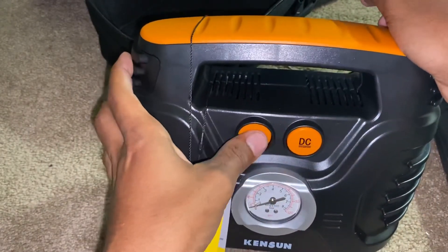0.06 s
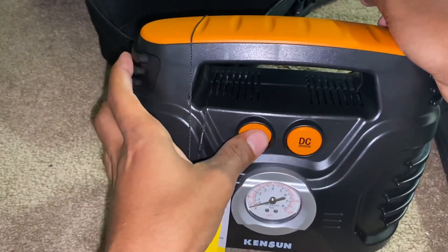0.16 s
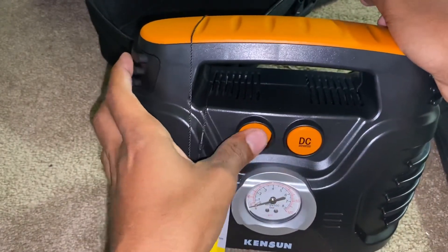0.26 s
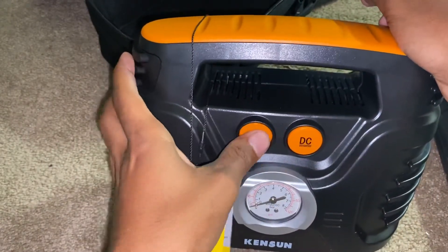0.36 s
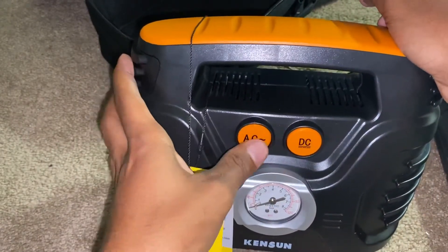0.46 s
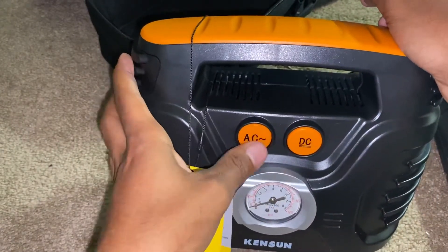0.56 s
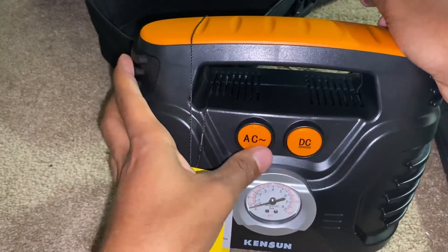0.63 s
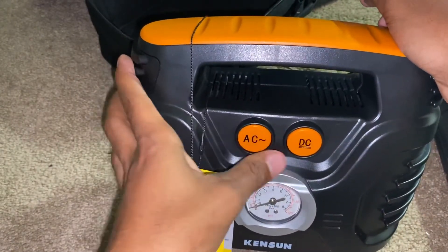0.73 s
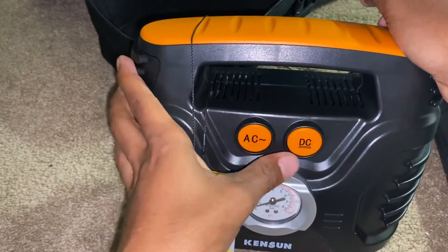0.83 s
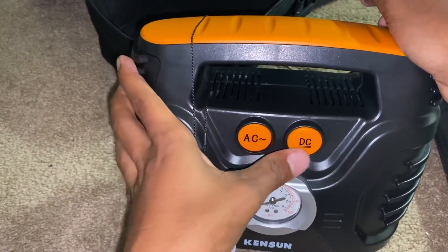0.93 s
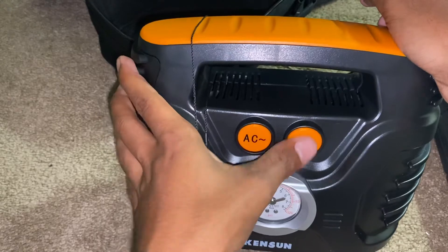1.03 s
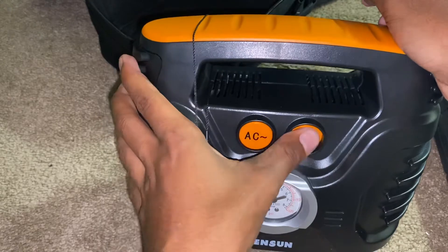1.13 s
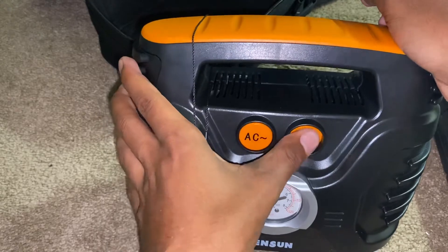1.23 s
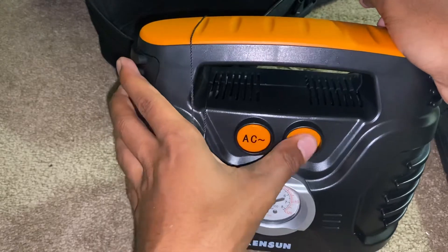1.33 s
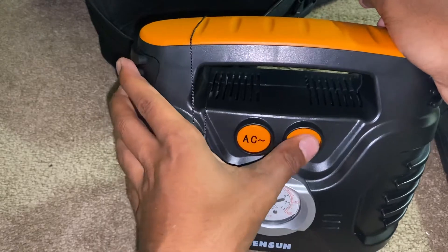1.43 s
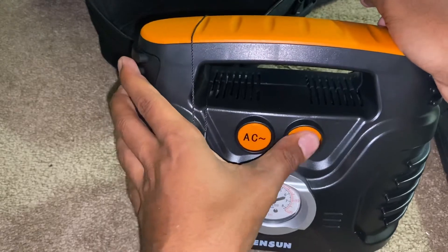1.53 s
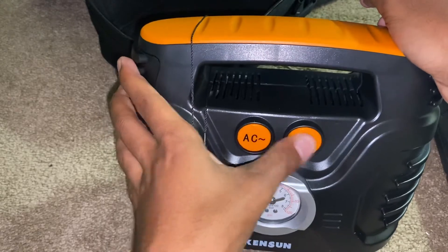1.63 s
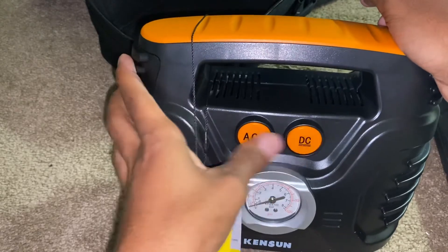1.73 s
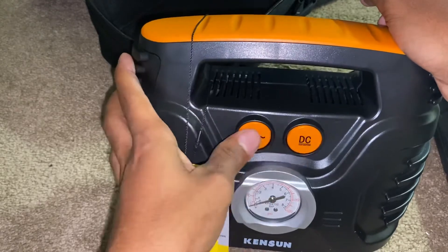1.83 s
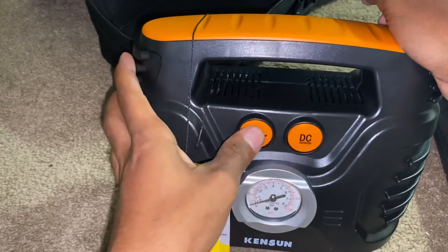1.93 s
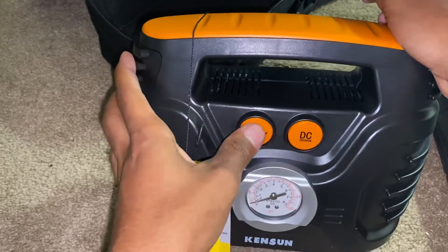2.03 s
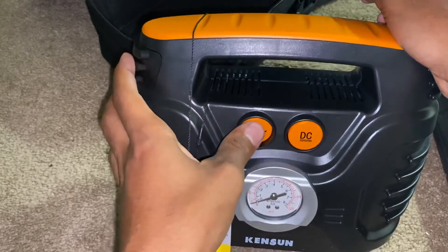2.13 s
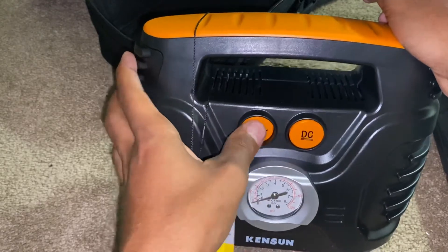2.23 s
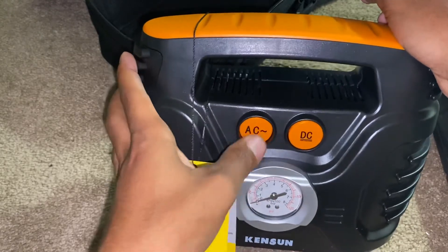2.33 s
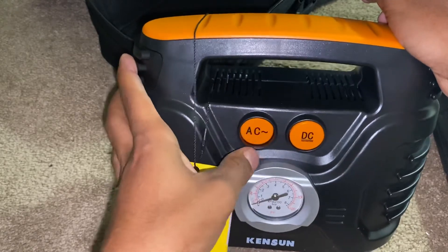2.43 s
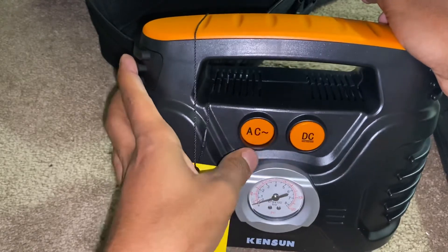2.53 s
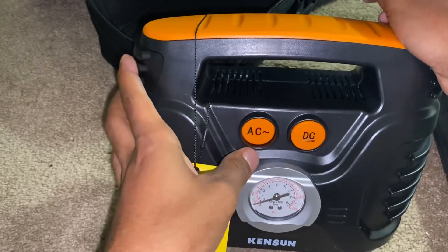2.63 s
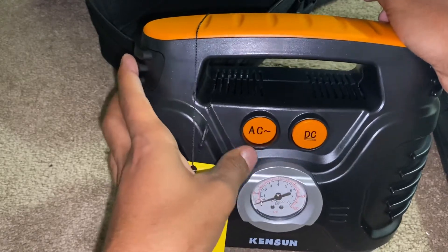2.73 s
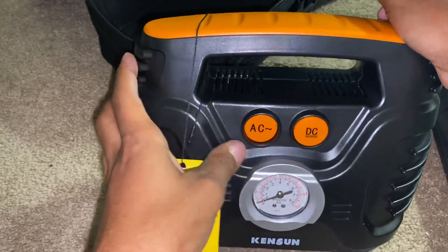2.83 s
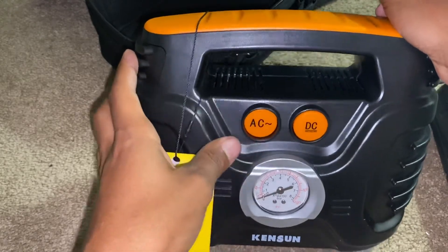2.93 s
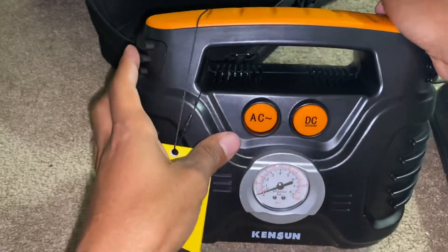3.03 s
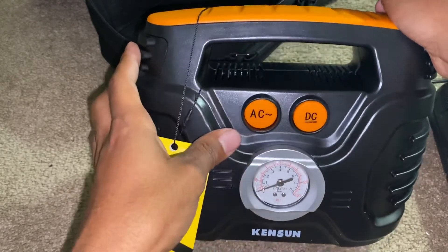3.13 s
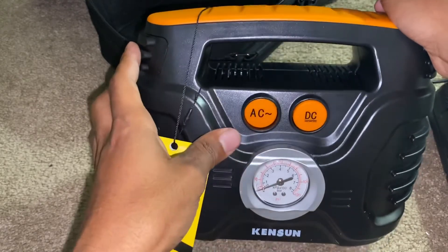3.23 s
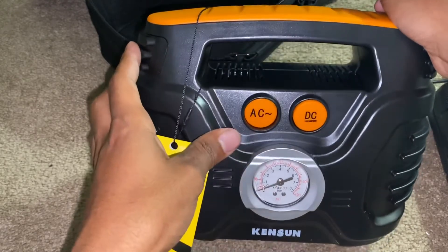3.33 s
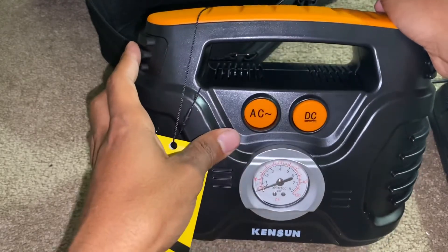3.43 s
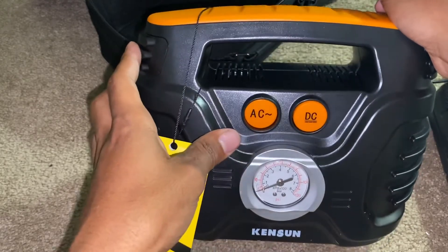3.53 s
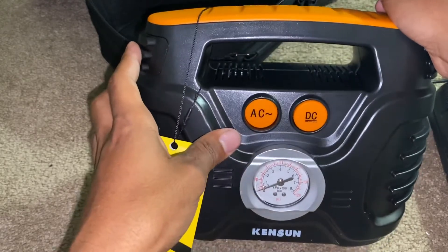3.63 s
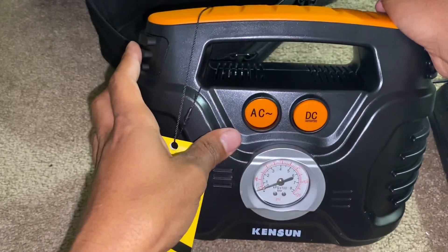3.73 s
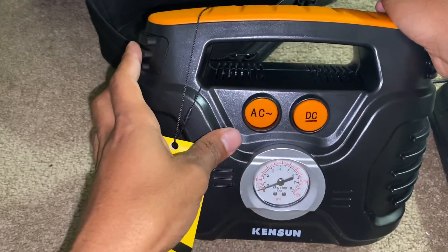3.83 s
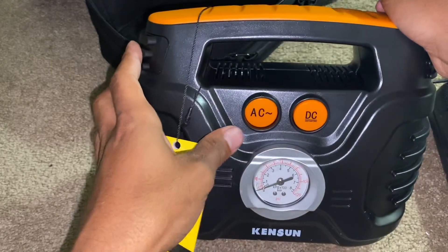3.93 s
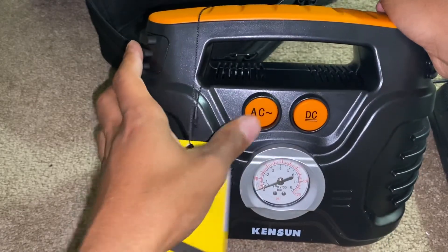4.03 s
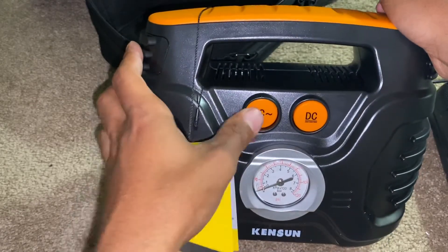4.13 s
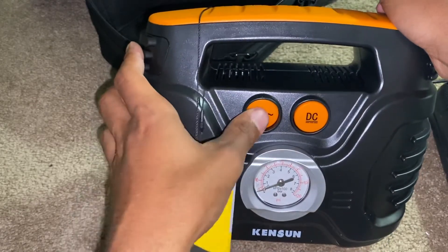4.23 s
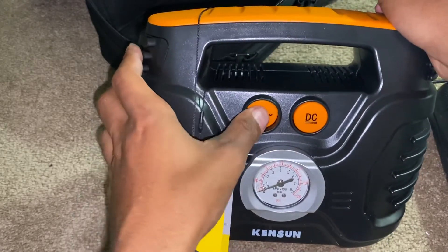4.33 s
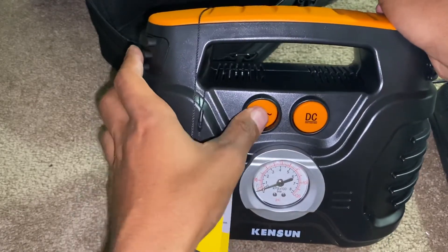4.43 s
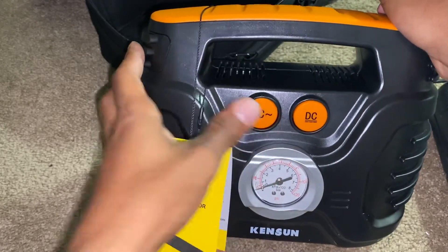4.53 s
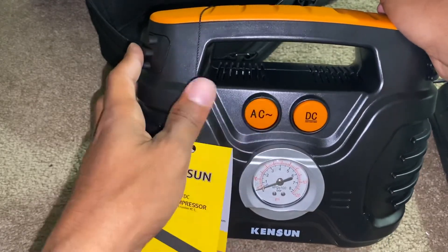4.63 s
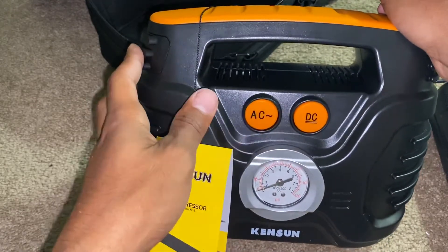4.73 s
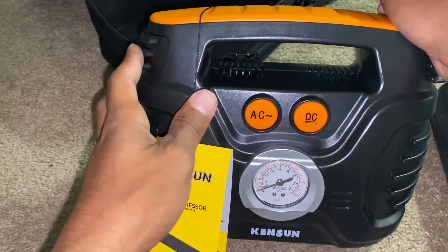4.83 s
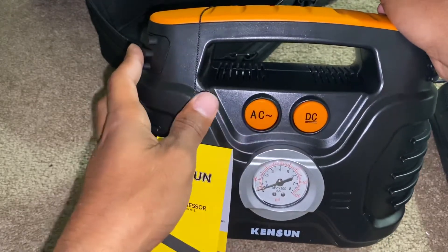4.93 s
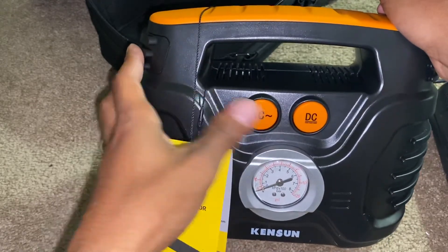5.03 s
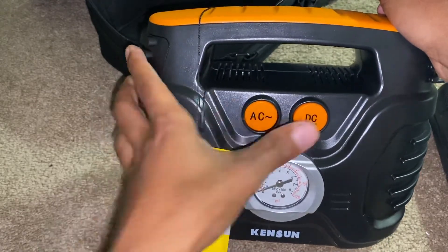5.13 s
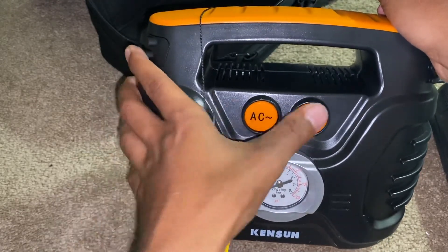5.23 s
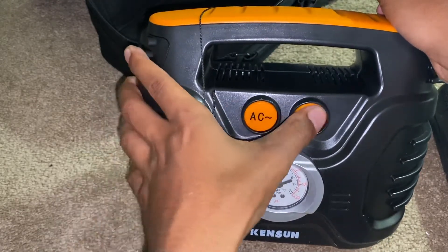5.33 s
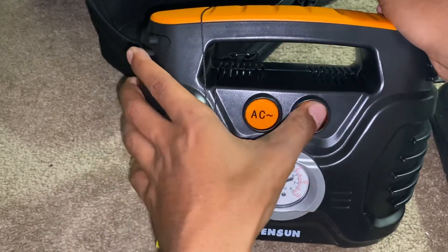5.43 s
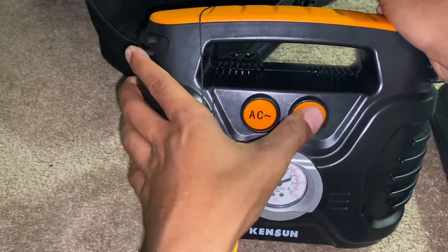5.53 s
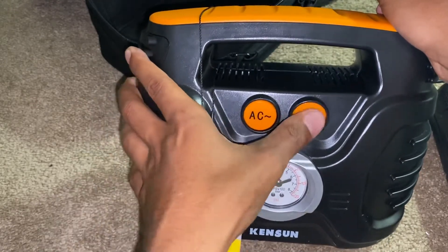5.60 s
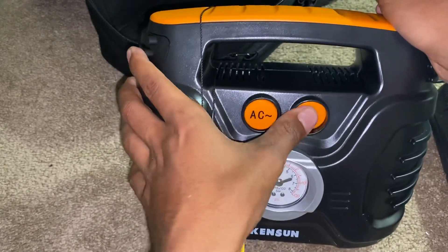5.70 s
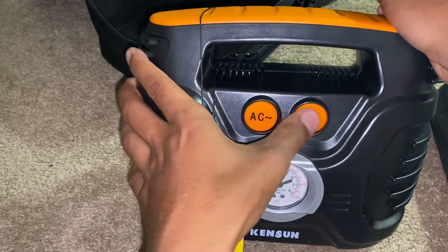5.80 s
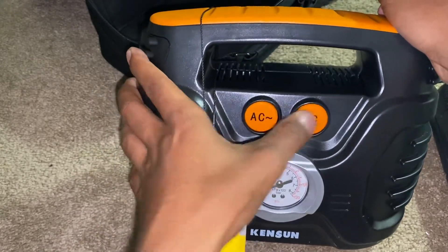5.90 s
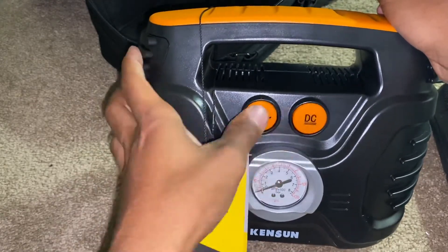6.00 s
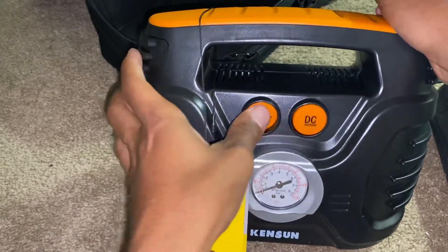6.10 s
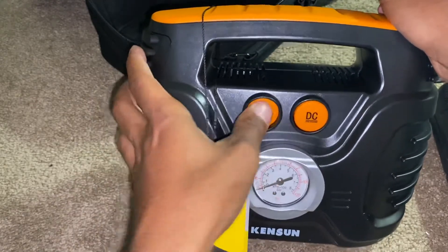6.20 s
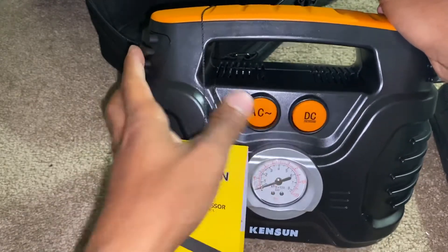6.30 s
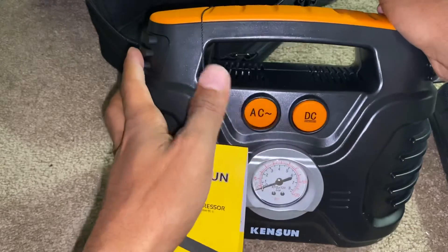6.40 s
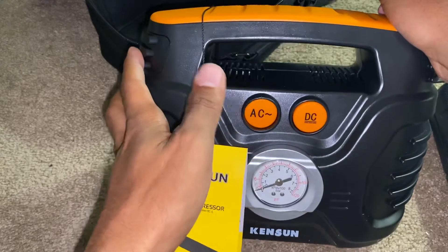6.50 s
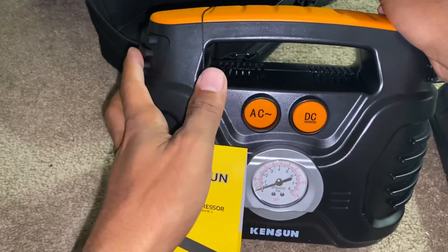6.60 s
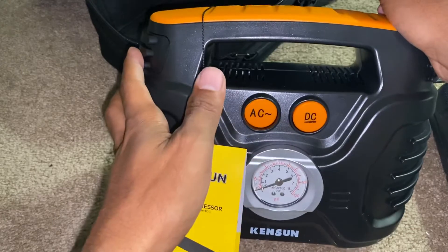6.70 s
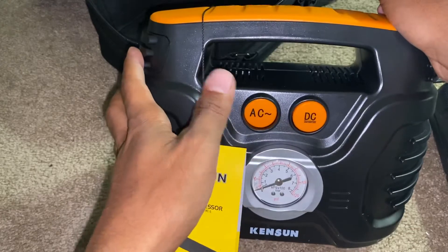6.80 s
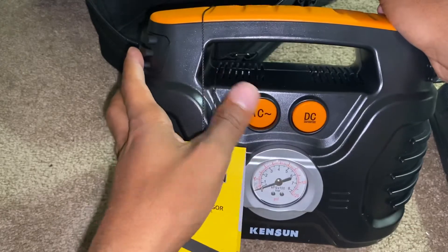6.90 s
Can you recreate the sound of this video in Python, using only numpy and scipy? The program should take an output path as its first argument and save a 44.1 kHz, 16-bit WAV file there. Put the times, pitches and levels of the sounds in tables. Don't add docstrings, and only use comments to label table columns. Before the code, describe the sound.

Close-up rattling drone of a portable piston pump switched off and on by clicking push buttons, squeaking briefly each time it slows down.

```python
import sys
import numpy as np
from scipy import signal
from scipy.fft import rfft, irfft, next_fast_len
from scipy.io import wavfile
from scipy.ndimage import map_coordinates

SR = 44100
rng = np.random.default_rng(int(sys.argv[2]) if len(sys.argv) > 2 else 0)


def field_ratio(decibels):
    return 10 ** (np.asarray(decibels, dtype=float) / 20)


def to_wav(s):
    ch = np.atleast_2d(s).T
    pcm = np.round(np.clip(ch, -1, 1) * 32767)
    wavfile.write(sys.argv[1], SR, pcm.astype(np.int16))


N = 306936

# on_s, full_speed (turns/s), run_up_s, first_crank_angle (turns)
RUN_STARTS = [
    (-1, 53.15, .03, -.529),
    (2.1087, 53.24, .0286, -.148),
    (6.1097, 53.07, .0255, -.481),
]
# pitch_hz, level_db (per Hz)
AIR_COLOUR = [(900, -29.5), (1600, -13), (2600, -14), (3020, -8.5), (3500, -14), (4250, -10), (5000, -13),
              (6800, -11), (8600, -5), (11000, -3), (13000, -5.5), (15600, -13), (15950, -36), (17000, -80)]


def unit(x):
    return x / np.sqrt(np.mean(x ** 2) + 1e-20)


def along(points, hz):
    point_hz, value = np.transpose(points)
    return np.interp(np.log(hz + 1), np.log(point_hz + 1), value)


def wobble(rate):
    knots = rng.standard_normal(int(N * rate / SR) + 4)
    return map_coordinates(knots, [np.arange(N) * rate / SR])


def filtered(x, response):
    size = next_fast_len(N + SR // 2)
    spectrum = rfft(x, size) * response(np.fft.rfftfreq(size, 1 / SR))
    return irfft(spectrum, size)[..., :N]


def noise(colour, channels=1):
    white = rng.standard_normal((channels, N))
    return unit(filtered(white, lambda hz: field_ratio(along(colour, hz))))


def mode(hz, width):
    return lambda f: SR / np.pi * 1j * f / (hz * hz - f * f + 1j * f * width)


def passes(angle, at):
    return np.diff(np.floor(angle - at), prepend=-9) == 1


def window(angle, centre, sharp):
    return np.exp(sharp * (np.cos(2 * np.pi * (angle - centre)) - 1))


def crank():
    # off_s, coast_s, friction (turns/s)
    stops = [
        (.4078, .323, 17.9),
        (4.4925, .431, 32.4),
        (9, .3, 20),
    ]
    t = np.arange(N) / SR
    share, angle = np.zeros(N), np.zeros(N)
    for (on, top, run_up, first), (off, coast, friction) in zip(RUN_STARTS, stops):
        rate = top * (1 - np.exp(-np.clip(t - on, 0, None) / run_up))
        slowing = np.exp(-np.clip(t - off, 0, None) / coast)
        rate = np.clip((rate + friction) * slowing - friction, 0, None)
        share += rate / top
        angle = np.where(t >= on, first + np.cumsum(rate) / SR, angle)
    return share, angle


def knocks(share, angle):
    # pitch_hz, width_hz, knock_angle (turns), knock_db, rebound_angle (turns), rebound_db
    casing = [(255, 170, .919, -27, .14, -31.5), (396, 50, .19, -22.5, .661, -31),
              (605, 50, .882, -41, .553, -42), (710, 55, .876, -32.5, .819, -30),
              (963, 260, .908, -29.5, .105, -37), (1145, 120, .342, -30.5, .147, -28),
              (1335, 129, .702, -39, .18, -28), (1885, 130, .9, -31, .112, -25),
              (2330, 60, .889, -44, .574, -52), (2847, 60, .738, -38, .802, -46),
              (3050, 150, .866, -31, .322, -43)]
    # time_s, level_db
    grip = [(0, -2.5), (1.999, -2), (4.5, 0.5), (7, 0.85)]
    out = np.zeros(N)
    slack = .0015 * wobble(60)
    for hz, width, knock_at, knock_db, rebound_at, rebound_db in casing:
        blows = np.zeros(N)
        for at, db in ((knock_at, knock_db), (rebound_at, rebound_db)):
            strength = field_ratio(db + 0.31 + 1.3 * rng.standard_normal(N)) * share ** 1.01
            blows -= passes(angle + slack, at) * strength
        out += filtered(blows, mode(hz, width))
    return out * field_ratio(np.interp(np.arange(N) / SR, *np.transpose(grip)))


def air(share, angle):
    # pitch_hz, level_db (per Hz)
    rattle_colour = [(24, -58), (40, -24), (107, -16), (163, -20), (197, -16.5), (427, -10), (516, -13.5),
                     (692, -9.5), (1010, -14.5), (1150, -7.5), (1600, -15.5), (1820, -6), (2190, -16.5),
                     (2940, -16), (6000, -23.5), (7800, -57), (13200, -120)]
    slow = 1 - share
    grit = field_ratio(2.2 * wobble(900) + 0.84 * wobble(50))
    stroke = window(angle, -0.027, sharp=1.56 + 3.1 * slow)
    flow = stroke * np.clip(share - .14, 0, 1) ** 0.5
    leak = 0.41 * share ** 2.0
    puff = unit(grit * noise(AIR_COLOUR)[0]) * (flow + leak)
    shaking = 0.88 * share ** 0.69 + window(angle, 0.12, sharp=1.8 + 1.2 * slow)
    rattle = noise(rattle_colour)[0] * shaking * share ** 1.1
    return np.array([field_ratio(-24.0) * puff, field_ratio(-31) * rattle * field_ratio(1.7 * wobble(30))])


def hum(share, angle):
    # multiple (of the crank rate), level_db, lead (cycles)
    unbalance = [(1, -43.5, 0.73), (2, -30, 0.16), (3, -81, 0.03), (4, -32, 0.64)]
    # multiple (of the crank rate), level_db
    gear = [(33.72, -44), (35, -45.5), (67.44, -57)]
    shake, whine = np.zeros(N), np.zeros(N)
    for multiple, db, lead in unbalance:
        shake += field_ratio(db - 0.5 + 0.56 * wobble(12)) * np.sin(2 * np.pi * (multiple * angle + lead))
    mesh = angle + 0.00097 * np.sin(2 * np.pi * angle) + 0.00065 * wobble(25)
    for multiple, db in gear:
        whine += field_ratio(db + 6.5 + 0.74 * wobble(14)) * np.sin(2 * np.pi * multiple * mesh)
    return shake * share ** 2.2 + whine * share ** 2.3


def squeak(share, angle):
    # multiple, level_db
    partials = [(1, 0), (2, -16), (3, -27), (4, -35), (5, -35)]
    # start_s, length_s, pitch_hz, level_db
    stutters = [
        (.70, 0.013, 497, -37.5),
        (0.731, 0.013, 467, -30.5),
        (0.742, .024, 993, -28.5),
        (2.119, 0.01, 946, -29),
        (4.782, .009, 666, -32),
        (4.79, 0.015, 491, -30),
        (4.804, 0.013, 926, -29.5),
        (4.851, 0.028, 489, -41),
    ]
    opens_at, sings_turns, longest_s = .86, .38, 0.027
    slowest, fastest = .25, .85
    opens = np.flatnonzero(passes(angle, opens_at) & (share > slowest) & (share < fastest))
    strokes = []
    for i in opens:
        length = min(sings_turns / (share[i] * RUN_STARTS[0][1]), longest_s)
        strokes.append((i, length, 785, 1046, -27.5, .0035))
    for start, length, hz, db in stutters:
        strokes.append((round(start * SR), length, hz, 1.05 * hz, db, .007))

    t, out = np.arange(SR // 6) / SR, np.zeros(N)
    flutter = wobble(150)
    for i, length, first_hz, last_hz, db, fade in strokes:
        hz = first_hz + (last_hz - first_hz) * np.clip(t / length, 0, 1)
        cycles = np.cumsum(hz * (1 + 0.025 * flutter[i:][:len(t)])) / SR
        rise = 1 - np.exp(-t / .0015)
        fall = np.exp(-np.clip(t - length, 0, None) / fade - .5 * t / length)
        tone = sum(field_ratio(level) * np.sin(2 * np.pi * multiple * cycles) for multiple, level in partials)
        out[i:i + len(t)] += field_ratio(db) * rise * fall * tone
    return out * field_ratio(2.2 * wobble(160))


def buttons():
    # pitch_hz, width_hz, level_db
    panel = [(1480, 120, -1), (1980, 160, -3), (2490, 170, 0.5), (3100, 320, -4)]
    # pitch_hz, level_db (per Hz)
    tick_colour = [(2500, -7), (4500, -5), (7000, -2), (10500, 2), (12500, 2), (15500, 3), (16800, -14.5)]
    # start_s, peak_db
    snaps = [
        (1.1029, -42),
        (1.133, -26.5),
        (1.3264, -23),
        (1.502, -21.5),
        (1.646, -27.5),
        (1.7938, -44),
        (5.3914, -26.5),
        (5.5293, -25.5),
        (5.7156, -22),
        (5.8482, -25),
    ]
    # start_s, peak_db
    cap_knocks = [
        (1.0772, -54),
        (1.1382, -40),
        (1.6524, -32.5),
        (2.121, -44.5),
        (5.3968, -35.5),
        (5.5523, -47.5),
        (5.8532, -30.5),
    ]
    # start_s, peak_db
    taps = [(1.8463, -60), (1.8597, -67), (1.919, -67), (5.196, -54.5), (5.361, -58), (5.6837, -59),
            (5.973, -56), (5.9944, -56.5), (6.0367, -61.5), (6.079, -63.5), (6.093, -55)]
    t = np.arange(SR // 10) / SR
    scratch, out = noise(tick_colour)[0], np.zeros((2, N + SR))
    tick_shape = np.exp(-t / 0.0014) + 0.15 * np.exp(-t / 0.0051)
    tick_shape = tick_shape * (1 - np.exp(-t / 0.00043))
    thud_band = signal.butter(2, [380, 3100], "band", fs=SR)
    # dull ring over the tick in dB, left over right in dB
    for contacts, ring_db, pan_db in ((snaps, -21, 1), (cap_knocks, 9.7, 1.5), (taps, 4, 4.7)):
        for start, db in contacts:
            i = round(start * SR)
            tick = field_ratio(db - 1.5) * scratch[i:][:len(t)] * tick_shape
            ring = np.zeros(len(t))
            for hz, width, level in panel:
                tone = np.sin(2 * np.pi * hz * t + rng.uniform(0, 4.5))
                ring += field_ratio(level + rng.normal(0, 1.7)) * np.exp(-np.pi * width * t) * tone
            thud = scratch[i + SR // 5:][:len(t)] * np.exp(-t / 0.0057)
            ring += 0.5 * signal.lfilter(*thud_band, 3.8 * thud)
            contact = tick + field_ratio(db + ring_db - 0.5) * ring
            out[:, i:i + len(t)] += contact * field_ratio([[pan_db / 2], [-pan_db / 2]])
    return out[:, :N]


def swells(events):
    t = np.arange(N) / SR
    return sum(field_ratio(db) * np.exp(-((t - start - length / 2) / (length / 2)) ** 4)
               for start, length, db in events)


def thumb_and_first_air():
    # start_s, length_s, level_db
    rubs = [
        (1.106, .05, -63),
        (1.477, 0.018, -73.5),
        (1.78, 0.09, -60),
        (1.885, .12, -74),
        (5.164, .08, -72),
        (5.363, 0.042, -59),
        (5.552, .014, -46),
        (5.692, 0.024, -58),
        (5.802, 0.073, -65.5),
        (6.095, 0.014, -60),
    ]
    # start_s, length_s, level_db
    surges = [
        (2.11, .016, -43),
        (6.106, .024, -39),
    ]
    # pitch_hz, level_db (per Hz)
    skin_colour = [(300, -19.5), (900, -1.5), (2500, -3.5), (7000, -9), (12000, -31), (16000, -20.5)]
    grain = field_ratio(4.7 * wobble(160))
    sliding = swells(rubs) * unit(noise(skin_colour)[0] * grain)
    hiss = swells(surges) * unit(noise(AIR_COLOUR)[0] * grain)
    return sliding + hiss


def echoes(x, shorter, channels):
    # pitch_hz, time_s (to fall 60 dB)
    walls = [(200, 0.099), (2000, 0.19), (8000, 0.19), (14000, 0.15)]
    hz, t, z = signal.stft(rng.standard_normal((channels, SR // 2)), SR, nperseg=256)
    fading = field_ratio(-60 * t * shorter / along(walls, hz)[:, None])
    tail = signal.istft(z * fading, SR, nperseg=256)[1]
    return signal.fftconvolve(x[None], tail / np.linalg.norm(tail[0]), axes=1)[:, :N]


def background():
    # pitch_hz, level_db
    mains_tones = [(59.6, -56), (119.6, -44), (178, -66.5), (240, -69.5)]
    # pitch_hz, level_db (per Hz)
    room_colour = [(20, -57.5), (40, -28.5), (60, -16.5), (95, -16.5), (150, -29), (200, -30.5), (320, -37),
                   (600, -38), (1200, -49.5), (2500, -57), (5000, -66), (9000, -75.5), (16000, -86.5)]
    t, mains = np.arange(N) / SR, np.zeros(N)
    for hz, db in mains_tones:
        level = field_ratio(db + 3.0 + 0.73 * wobble(10))
        mains += level * np.sin(2 * np.pi * hz * t + 0.24 * wobble(4.2))
    alike = lambda hz: 1 / (1 + (hz / 300) ** 2)
    common = filtered(noise(room_colour), lambda hz: np.sqrt(alike(hz)))
    own = filtered(noise(room_colour, channels=2), lambda hz: np.sqrt(1 - alike(hz)))
    return mains * field_ratio([[1.2], [-1.2]]) + field_ratio(-49.0 + 0.42 * wobble(35)) * (common + own)


def scene():
    # pitch_hz, level_db
    echo_ahead = [(200, -15.5), (1500, -13.5), (5000, -24), (12000, -21.5), (16000, -14)]
    # pitch_hz, level_db
    left_louder = [(150, 2), (330, 0.5), (700, 0.5), (1300, 0.5), (2500, 0.5), (5000, 3.8), (8000, 0.5)]
    # pitch_hz, lead (radians)
    left_lead = [(0, 0), (700, .1), (1400, -.2), (2300, 1.1), (4600, .2), (5050, -2.1), (6000, 0),
                 (7300, -.3), (8600, -2.75), (9500, -3.45), (11100, -6.28), (12600, -9.0), (13850, -9.8),
                 (15300, -12.57)]
    # pitch_hz, level_db
    sideways = [(100, -22.5), (200, -22.5), (300, -16.5), (600, 2), (850, -6.5), (1400, -8), (2600, -6),
                (4200, -10), (5300, -4), (7000, -7.5), (10300, -17.5), (13200, -20), (16000, -17)]
    share, angle = crank()
    inside = lambda x: filtered(x, lambda f: np.clip((15880 - f) / 150, 0, 1))
    casing = inside(knocks(share, angle))
    tones = inside(hum(share, angle) + squeak(share, angle))
    puff, rattle = inside(air(share, angle))
    parts = [casing, tones, puff, rattle]

    close = sum(parts) + buttons() + thumb_and_first_air()
    late = np.pad(close.mean(0), (300, 0))
    close = close + filtered(echoes(late, shorter=1, channels=1), lambda f: field_ratio(along(echo_ahead, f)))
    sides = sum(echoes(part, shorter=3.6, channels=1) for part in parts) * [[1], [-1]]
    sides = sides + field_ratio(-8.5) * echoes(late, shorter=1, channels=2)

    hz, lead = np.transpose(left_lead)
    facing = np.array([[.5], [-.5]])
    tilt = lambda f: field_ratio(facing * along(left_louder, f)) * np.exp(1j * facing * np.interp(f, hz, lead))
    ports = filtered(close, tilt)
    return ports + filtered(sides, lambda f: field_ratio(along(sideways, f))) + background()


def roll_off(x):
    return signal.sosfilt(signal.butter(12, 16860, fs=SR, output="sos"), x)


def record(dry):
    # time_s, level_db
    gain = [(0, -1.5), (2, -1.5), (2.2, 1.5), (4.5, -0.56), (5, 1), (7, 0.34)]
    time_s, level_db = np.transpose(gain)
    mix = dry * field_ratio(np.interp(np.arange(N) / SR, time_s, level_db))
    return roll_off(mix)


dry = scene()
out = record(dry)
to_wav(out)
```